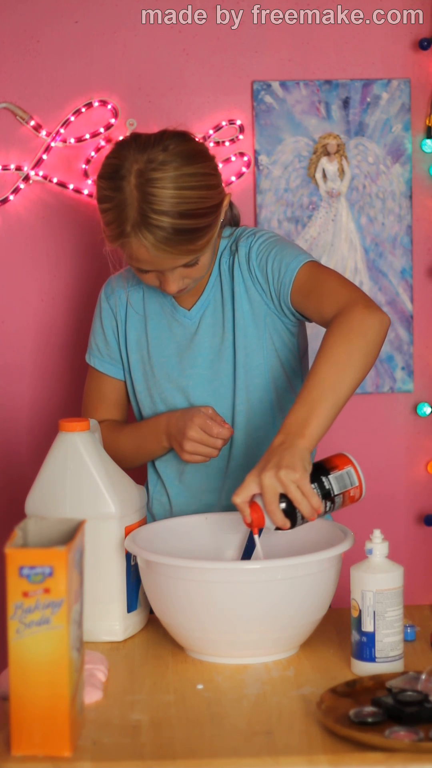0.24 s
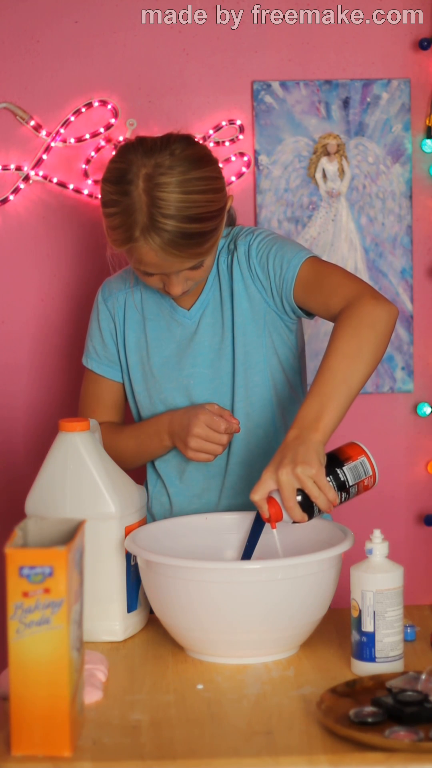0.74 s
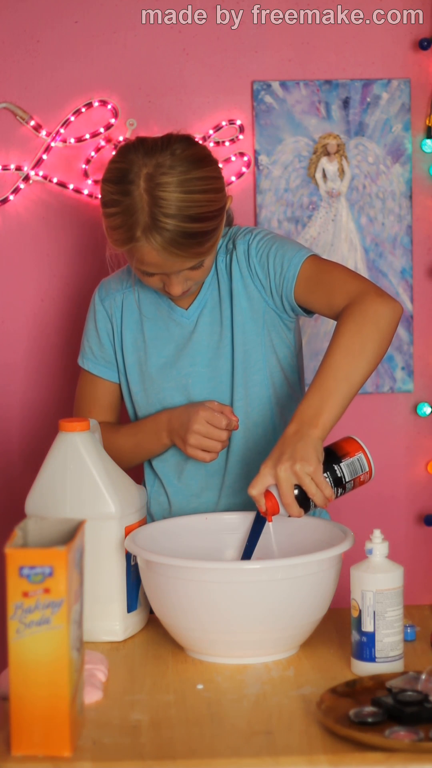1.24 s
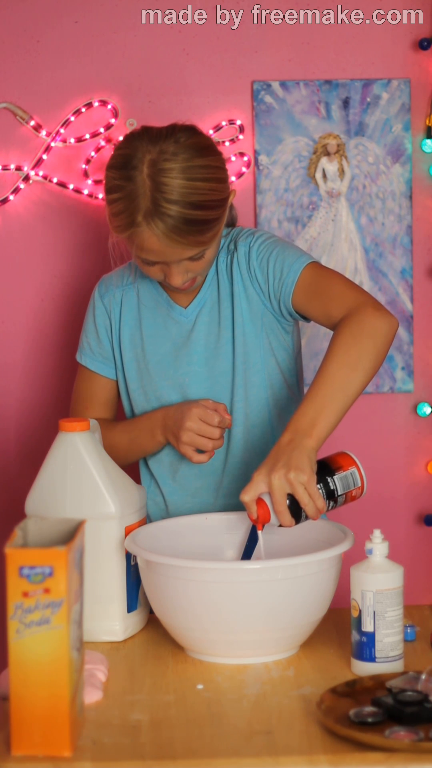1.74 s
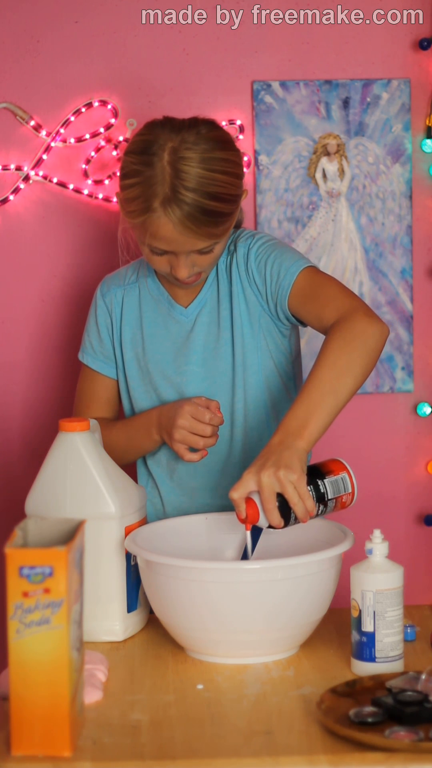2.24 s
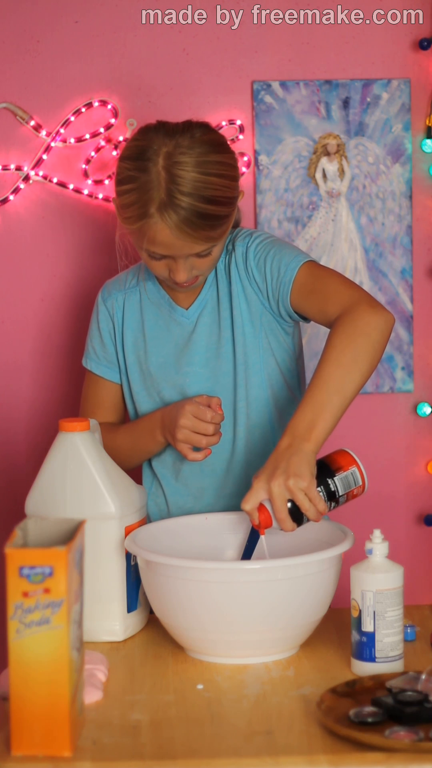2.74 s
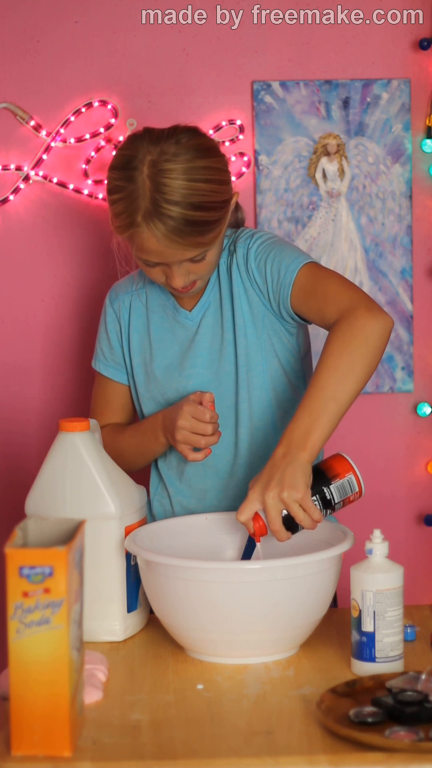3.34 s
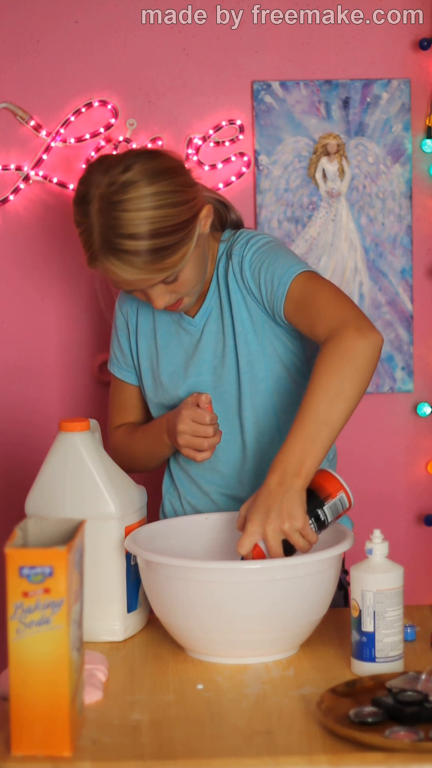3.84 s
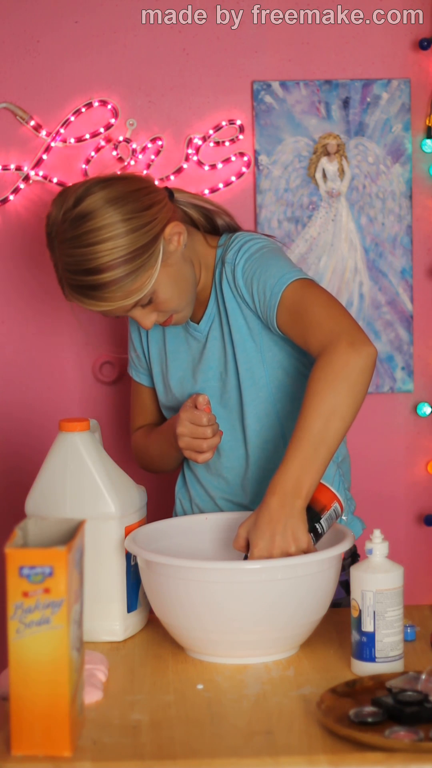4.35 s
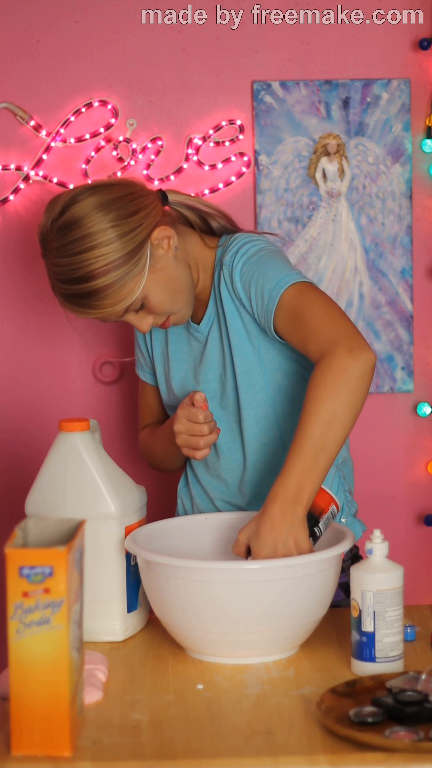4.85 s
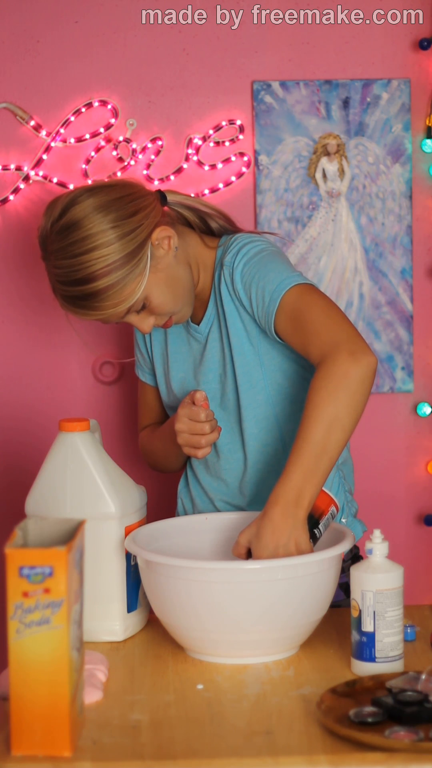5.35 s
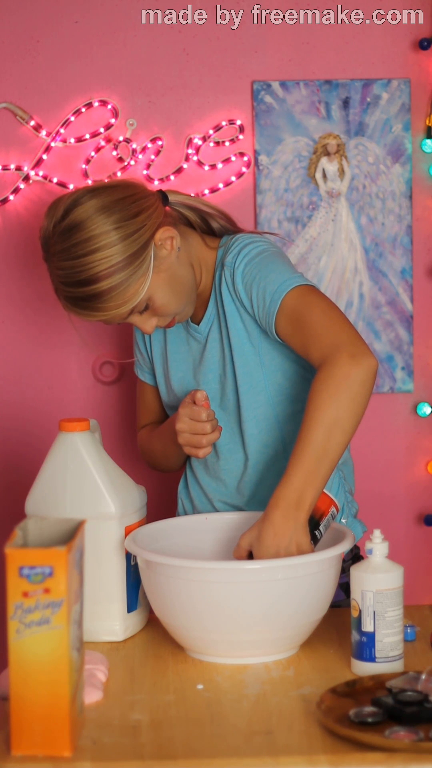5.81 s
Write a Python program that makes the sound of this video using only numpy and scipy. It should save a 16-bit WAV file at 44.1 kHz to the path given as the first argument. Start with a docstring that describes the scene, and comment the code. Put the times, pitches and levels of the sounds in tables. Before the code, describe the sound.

An aerosol can sprays foam into a plastic bowl for about six seconds, with a loud, bright hiss that is already going at the start. The jet sputters throughout: wet squelches, fine crackling bubbles and short spits of gas, with a faint wavering whistle in the noise. Its tone shifts gradually as the can moves over the bowl at about 1 second and toward the rim between 2 and 3.5 seconds, with the spits coming more often from about 2.5 seconds. Near 3.8 seconds the can is deep inside and the spray turns slightly hollower. At 4 seconds the can softly bumps the bowl's wall. From there to the end the hiss continues, dipping for instants as foam clogs the nozzle. A single microphone hears it in a small room with little echo and a very faint low rumble underneath.

```python
"""Aerosol foam sprayed into a bowl

A can sprays foam into a plastic bowl on a table in a small room, heard by one microphone.
The turbulent jet sputters: gas hisses and spits, foam gurgles, and can and bowl resonate.
The colour changes as the can is held high, over the bowl, at its rim and then deep inside,
where it bumps the wall. The house rumbles faintly underneath."""
import sys
import numpy as np
from scipy import signal
from scipy.fft import rfft, irfft
from scipy.io import wavfile
from scipy.ndimage import uniform_filter1d

SR = 44100
rng = np.random.default_rng(int(sys.argv[2]) if len(sys.argv) > 2 else 0)


def generate_wav(sig):
    """Save sig (samples, or channels by samples) to the path in sys.argv[1] as 16-bit PCM at SR."""
    pcm = np.round(np.clip(np.atleast_2d(sig).T, -1, 1) * 32767).astype(np.int16)
    wavfile.write(sys.argv[1], SR, pcm)


N = 268128
T = np.arange(N) / SR
HZ = np.maximum(np.arange(N // 2 + 1) * SR / N, 1.)

# path of the can: (time [s], place [0 high, 1 over the bowl, 2 at the rim, 3 inside])
CAN_DEPTH = [(0, 0), (.7, 0.23), (1.05, 0.76), (2.3, 1.53), (2.8, 1.22), (3.7, 2.46), (3.85, 3), (6.08, 3)]
# plugs of foam leaving the nozzle: (time [s], peak level before resonance [dB], pitch [Hz])
FOAM_PLUGS = [(.008, -24, 5530), (0.147, -15, 5400), (0.169, -12, 2770), (.35, -12.5, 5950),
              (.6, -17, 2730), (.7, -14, 5560), (0.706, -13, 2920), (.92, -15, 2850), (1.101, -11.5, 6100),
              (1.291, -13, 6050), (1.345, -11.5, 4830), (1.628, -9, 5000), (2.27, -12, 5800),
              (2.58, -9, 6160), (2.7382, -13, 4340), (2.99, -19, 4470), (3.055, -9.5, 5160),
              (3.1, -10, 5100), (3.1593, -12, 4540), (3.4028, -13, 3960), (3.479, -15, 3540),
              (3.565, -11, 4360), (3.65, -12.5, 5850), (3.6845, -12, 4060), (3.8277, -12, 3700),
              (4.135, -10.5, 4800), (4.216, -13.5, 4500), (4.7703, -14.5, 4050), (5.126, -10, 4260),
              (5.21, -13, 6230), (5.25, -10, 4670), (5.3264, -13.5, 4650), (5.446, -9.5, 4760),
              (5.565, -12, 4780), (5.5975, -9.5, 6000), (5.9946, -11, 5050), (6.064, -10, 5230)]


def undb(db):
    """Amplitude ratio of a level in decibels."""
    return 10 ** (np.asarray(db) / 20)


def curves(table):
    """Linear interpolation in time of a table's columns, one value a sample."""
    times, *columns = np.transpose(table)
    return [np.interp(T, times, column) for column in columns]


def spell(middle_s, length_s):
    """A flat-topped envelope that swells from 0 to 1 and back."""
    return np.exp(-((T - middle_s) / (length_s / 2)) ** 4)


def flicker(rate):
    """Random modulation: `rate` levels a second, smoothed and freed of slow drift; spread 1."""
    hold = max(int(SR / rate), 2)
    steps = np.repeat(rng.standard_normal(N // hold + 1), hold)
    smooth = uniform_filter1d(uniform_filter1d(steps, hold), hold)[:N]
    wander = smooth - uniform_filter1d(smooth, 8 * hold)
    return np.roll(wander, rng.integers(hold)) / wander.std()


def bubbles(rate, low_hz, high_hz, cycles, glide, scatter_db):
    """Bursting bubbles are damped oscillators, rising in pitch and decaying over about `cycles`; rms 1."""
    out = np.zeros(N + SR)
    for when, pitch, size, length in rng.random((int(rate * N / SR), 4)):
        hz = low_hz * (high_hz / low_hz) ** pitch
        turns = np.arange(int(3 * cycles * (0.67 + length) * SR / hz)) * hz / SR
        age = turns / turns[-1]
        envelope = np.exp(-4 * age) * np.minimum(turns / 2, 1)
        tone = np.sin(2 * np.pi * turns * (1 + glide * age / 2)) * envelope
        out[int(when * N):][:len(tone)] += undb(-scatter_db * np.log(0.14 + size)) * tone
    return out[:N] / out[:N].std()


def sputter(own_rate=70., shared_rate=125., froth_db=-11., crackle_db=-7, onset_hz=1500, gas_hz=7000):
    """Turbulent noise and bubbles, amplitude-modulated band by band as foam and gas take turns."""
    froth = bubbles(rate=500., low_hz=4553, high_hz=13820, cycles=20.8, glide=0.323, scatter_db=1.)
    crackle = bubbles(rate=500., low_hz=7000, high_hz=15000, cycles=4., glide=.2, scatter_db=4.)
    spectrum = rfft(rng.standard_normal(N) + undb(froth_db) * froth + undb(crackle_db) * crackle)
    centres = 1500 * 2 ** np.arange(0, 3.5, 1 / 7)  # seven bands an octave
    bands = np.array([np.exp(-.5 * (14 * np.log2(HZ / hz)) ** 2) for hz in centres])
    bands[0, HZ < centres[0]] = 1
    bands /= bands.sum(axis=0)
    gas_rush, out = flicker(shared_rate), 0
    for hz, band in zip(centres, bands):
        unrest = np.clip(np.log2(hz / onset_hz) / 3.37, 0, 1.2)  # the treble is the most restless
        follow = 1 if hz > gas_hz else -1  # a rush of gas lifts the hiss and thins the gurgle
        own_flicker = 2.5 * flicker(own_rate) + 3.3 * flicker(own_rate / 2.5)
        gain = undb(unrest * (own_flicker + 2 * follow * gas_rush))
        out = out + irfft(spectrum * band, N) * gain / np.sqrt(np.mean(gain ** 2))
    return out


def colour(place):
    """Spectral envelope of the jet: broad gain against frequency for one place of the can."""
    # one envelope for each place: (frequency [Hz], relative spectral level [dB])
    high = [(100, -72), (170, -40), (510, -30), (691, -33.5), (972, -23), (1370, -18.5), (1590, -4),
            (1890, -4), (2460, 0.5), (3950, -10.5), (6720, -1.5), (13100, -4), (15800, -16)]
    over_bowl = [(100, -65), (170, -33), (356, -28), (384, -19.5), (510, -23.5), (732, -32.5), (1590, -1.5),
                 (2000, 0), (2330, -10), (2660, -1), (4350, 6), (10000, 5), (15800, -4.5)]
    at_rim = [(100, -71), (170, -44.5), (520, -29), (583, -26.5), (1290, -8.5), (1820, -0.5), (2000, -5),
              (2330, 1.5), (2870, -4), (3880, 7), (4190, 4.5), (9460, -2), (15800, -11)]
    inside = [(100, -68), (170, -32.5), (473, -11.5), (520, -17.5), (583, -25), (885, -33.5), (1180, -21.5),
              (1890, -5.5), (3150, -3.5), (3880, -1.5), (4600, -1.5), (11700, -8.5), (15800, -19)]
    hz, db = np.transpose((high, over_bowl, at_rim, inside)[place])
    return undb(np.interp(np.log(HZ), np.log(hz), db))


def resonances(place):
    """Frequency response of can and bowl at one place: Lorentzian peaks and dips add in power."""
    # (frequency [Hz], width [Hz], gain held high [dB], over the bowl [dB], at the rim [dB], inside [dB])
    modes = [(280, 45, 9, 9, 9, 9), (365, 20, 8, 8, 9, 9), (514, 18, 13, 14, 12, 13), (645, 18, 5, 5, 5, 7),
             (893, 24, 0, 2, 5, 18), (990, 35, 9, 8, 10, 9), (1545, 80, 6, 6, 5, 3),
             (1825, 50, 3, 6, 9, 11), (1930, 60, 0, 0, 3, 9), (2325, 90, 2, 2, 5, 10),
             (2530, 40, 4, 5, 7, 0), (3010, 110, 7, 4, 0, 0), (3470, 60, 10, 4, 2, 4),
             (3600, 40, 5, 5, 0, 7), (2900, 300, 0, -2, -6, -4), (3110, 260, 0, 0, -2, -6),
             (1250, 300, 0, 0, -5, -2), (4150, 200, 0, 0, -5, 0), (4255, 30, 0, 3, 2, 8),
             (4390, 40, 0, 5, 5, 5), (4510, 40, 0, 2, 8, 0), (4700, 110, 0, 2, 0, 8),
             (5130, 90, 6, 5, 8, 7), (5460, 90, 4, 3, 2, 3), (5950, 180, 4, 4, 3, 8),
             (6420, 35, 3, 4, 3, 5), (6900, 70, 5, 3, 2, 4), (7520, 80, 2, 5, 2, 3)]
    excess_power = sum((undb(2 * db[place]) - 1) / (1 + (2 * (HZ - hz) / width_hz) ** 2)
                       for hz, width_hz, *db in modes)
    return np.sqrt(1 + excess_power)


def spray():
    """Source and filter: jet and spits excite can and bowl, whose response shifts as the can moves."""
    # slow course of the upper bands: (time [s], gurgle [dB], body [dB], gas hiss [dB])
    jet_levels = [(0, -18.5, -23.5, -25.5), (.3, -23, -24, -27.5), (.65, -21, -25, -29),
                  (1.0, -21, -27, -26.5), (1.2, -24, -26, -23), (1.6, -22.5, -28, -24.5),
                  (2.0, -20.5, -25.5, -23.5), (2.5, -21.5, -26, -24), (3.0, -22, -27, -24.5),
                  (3.35, -21, -24, -26), (3.6, -22, -24.5, -26), (4.1, -21, -25.5, -26),
                  (4.6, -19, -26.5, -27), (5.0, -21, -25, -27), (5.5, -20.5, -25.5, -27.5),
                  (5.85, -17.5, -25.5, -30.5), (6.08, -23, -26, -28)]
    # the bowl's air and wall: (level held high [dB], over the bowl [dB], at the rim [dB], inside [dB])
    hollow_by_place, boom_by_place = (-37.5, -38.5, -42, -38), (-46.5, -45.5, -45, -45)
    # crossovers between boom, hollow band, body, gurgle and gas hiss: (frequency [Hz])
    edges_hz = (600, 1400, 3300, 7000)
    # weight of a choke's loss in each of these five bands: (factor [1])
    choke_reach = (0.12, 0.09, 0.43, 1.2, 0.49)
    gurgle_db, body_db, gas_db = curves(jet_levels)
    depth, = curves(CAN_DEPTH)
    hollow_db, boom_db = (np.interp(depth, range(4), db) for db in (hollow_by_place, boom_by_place))
    band_db = np.array([boom_db, hollow_db, body_db, gurgle_db, gas_db - smother()])
    levels = undb(band_db - np.outer(choke_reach, chokes()))
    highpasses = [1 / (1 + (edge / HZ) ** 16) for edge in edges_hz]
    bands = -np.diff([np.ones_like(HZ), *highpasses, np.zeros_like(HZ)], axis=0)
    jet, bursts = rfft(sputter()), rfft(spits() + squelches())
    out = 0
    for place in range(4):
        share = np.maximum(1 - np.abs(depth - place), 0)  # crossfade between neighbouring places
        response = resonances(place)
        parts = irfft(jet * colour(place) * response * bands, N)
        flow = np.sum(levels * parts / parts.std(axis=1, keepdims=True), axis=0)
        out = out + share * (flow + irfft(bursts * response, N))
    return out


def narrow_noise(hz, width_hz, flutter_db=2.5, flutter_rate=110., steadying=.15):
    """Quadrature modulation shifts slow noise to a fluttering band whose centre may move; rms 1."""
    lowpass = 1 / (1 + (2 * HZ / width_hz) ** 2)
    in_phase, quadrature = (irfft(rfft(rng.standard_normal(N)) * lowpass, N) for _ in range(2))
    phase = 2 * np.pi * np.cumsum(np.broadcast_to(hz, N)) / SR
    tone = in_phase * np.cos(phase) + quadrature * np.sin(phase)
    tone /= np.hypot(in_phase, quadrature) ** steadying  # holds back part of the wavering
    tone *= undb(flutter_db * flicker(flutter_rate))
    return tone / tone.std()


def singing():
    """Flow-driven resonances sing as narrow bands of noise and weaken when the nozzle chokes."""
    # levels of three resonances: (time [s], first [dB], second [dB], third [dB])
    tone_levels = [(0, -46, -32, -25.5), (.72, -35, -39, -35), (.9, -36, -32, -25.5), (1.4, -34, -24, -25),
                   (1.6, -33, -42, -28), (2.3, -32, -28, -34), (2.5, -40, -25, -29), (2.65, -40, -38, -28),
                   (2.85, -23, -24.5, -25.5), (3.35, -25.5, -24, -26.5), (3.45, -19.5, -28, -34),
                   (3.85, -24.5, -36, -34), (3.95, -30, -28, -45), (4.7, -28.5, -29, -55),
                   (5.3, -28, -32, -36), (6.08, -28.5, -28, -43)]
    # drift of the second as the can moves: (time [s], frequency [Hz])
    drift = [(0, 4400), (1.5, 4390), (2.25, 4430), (2.55, 4600), (2.8, 4480), (3.6, 4500), (4.0, 4390),
             (6.08, 4400)]
    # parts of the can ringing in spells: (middle [s], length [s], level [dB], frequency [Hz])
    can_spells = [(.62, 0.21, -36, 3550), (2.12, 0.48, -31, 3550), (3.36, .3, -30, 1840),
                  (4.0, 0.23, -31, 3550), (4.2, .3, -30, 5150), (4.8, .12, -29, 1820),
                  (5.95, .28, -29, 5200)]
    inside = np.clip(curves(CAN_DEPTH)[0] - 2, 0, 1) ** 2
    centres_hz = [3925 + 60 * inside, curves(drift)[0], 2320]  # the first rises inside the bowl
    widths_hz = (125, 160, 150)
    tones = sum(undb(db) * narrow_noise(hz, width_hz)
                for hz, width_hz, db in zip(centres_hz, widths_hz, curves(tone_levels)))
    swells = np.array([undb(db) * spell(s, length) for s, length, db, _ in can_spells])
    loudest_hz = np.array(can_spells)[swells.argmax(axis=0), -1]  # only the loudest part sounds
    can_ring = swells.max(axis=0) * narrow_noise(loudest_hz, width_hz=110)
    return (tones + can_ring) * undb(-chokes())


def pops(level_db=-32):
    """Lone large bubbles burst and ring with light damping."""
    return undb(level_db) * bubbles(rate=110., low_hz=5500, high_hz=11000,
                                    cycles=60., glide=.03, scatter_db=2.)


def rumble(level_db=-66):
    """Background of the house: stationary noise with its power at low frequencies."""
    # (frequency [Hz], relative spectral level [dB])
    spectrum = [(12, -42), (20, -10), (43, -8), (70, 0.5), (139, -7.5), (167, -22), (190, 0), (250, -9),
                (420, -120)]
    hz, db = np.transpose(spectrum)
    gain = undb(np.interp(np.log(HZ), np.log(hz), db, left=-90, right=-90))
    noise = irfft(rfft(rng.standard_normal(N)) * gain, N)
    return undb(level_db) * noise / noise.std()


def room(direct, t60_s=.2, tail_db=-7, gap_s=.004):
    """Reverberation: dense reflections follow the direct sound and decay exponentially."""
    t = T[:SR // 2]
    tail = rng.standard_normal(len(t)) * 1000. ** (-t / t60_s) * (t > gap_s)
    tail *= undb(tail_db) / np.sqrt(np.sum(tail ** 2))
    return (direct + signal.fftconvolve(direct, tail)[:N]) / np.sqrt(1 + undb(2 * tail_db))


def interference(sound):
    """Destructive interference: an echo off the bowl partly cancels a band for a while."""
    # (middle [s], length [s], frequency [Hz], width [Hz], share cancelled [0-1])
    notches = [(.45, 1.0, 3860, 350, 0.4), (1.15, .7, 3300, 250, .45), (2.244, 0.87, 3190, 350, 0.43),
               (2.9, 0.67, 2860, 160, 0.7), (3.797, 0.55, 1320, 456, 0.6)]
    spectrum = rfft(sound)
    for s, length, hz, width_hz, share in notches:
        band = irfft(spectrum / (1 + (2 * (HZ - hz) / width_hz) ** 4), N)
        sound = sound - share * spell(s, length) * band
    return sound


def puffs(events, t60_s, rise_s, width_hz):
    """Transient turbulence: each event is a decaying burst of noise, band-passed around its pitch."""
    t, out = T[:SR // 10], np.zeros(N + SR)
    envelope = 1000. ** (-t / t60_s) * (1 - np.exp(-t / rise_s))
    for s, db, hz in events:
        edges = np.clip([hz - width_hz / 2, hz + width_hz / 2], 1500, 18000)
        bandpass = signal.butter(2, edges, "bandpass", fs=SR, output="sos")
        puff = signal.sosfilt(bandpass, rng.standard_normal(len(t)) * envelope)
        out[int(s * SR):][:len(t)] += undb(db) * puff / np.abs(puff).max()
    return out[:N]


def squelches():
    """Each plug of foam leaves the nozzle with a wet, narrow-band burst of noise."""
    return puffs(FOAM_PLUGS, t60_s=0.08, rise_s=.01, width_hz=1120)


def smother(full_loss_db=6, full_plug_db=-4, length_s=0.037):
    """Attenuation of the gas hiss in dB as a plug passes, in proportion to its squelch's amplitude."""
    half_s = length_s / 2
    return sum(full_loss_db * undb(db - full_plug_db) * np.exp(-((T - s - half_s) / half_s) ** 2)
               for s, db, _ in FOAM_PLUGS)


def chokes(clear_share=0.64):
    """Throttling loss in dB: foam chokes the nozzle, which clears in a share of the time that took."""
    # (time of the deepest point [s], loss [dB], nominal length [s])
    blockages = [(0.054, 8, 0.018), (1.952, 5, 0.026), (2.043, 5, 0.058), (2.495, 3.5, 0.039),
                 (2.945, 5, 0.042), (3.236, 3, 0.12), (3.549, 5, 0.048), (3.815, 2.5, 0.036),
                 (3.872, 2, .03), (4.206, 4, 0.06), (4.496, 5, 0.067), (4.672, 3, 0.041),
                 (4.917, 7.5, 0.082), (5.116, 7.5, 0.07), (5.36, 3.5, 0.03), (5.53, 2, 0.043),
                 (5.653, 7, .04), (5.782, 3, 0.12)]
    loss_db = np.zeros(N)
    for s, db, length in blockages:
        slope_s = length / 2 * np.where(T < s, 1, clear_share)
        loss_db += db * np.exp(-((T - s) / slope_s) ** 2)
    return loss_db


def spits():
    """Gas spits from the nozzle in short, bright bursts of broadband turbulence."""
    # (time [s], peak level before resonance [dB], pitch [Hz])
    gas_bursts = [(0.7272, -11.5, 12100), (1.5514, -13, 8250), (2.5167, -6.5, 8050), (2.8265, -9.5, 7140),
                  (2.8744, -14, 7100), (3.0335, -12, 10900), (3.2939, -10.5, 8200), (3.3727, -12, 8660),
                  (3.5808, -18, 7740), (3.923, -12, 7000), (4.4558, -10.5, 11700), (4.6643, -11.5, 9400),
                  (4.9482, -16, 10400), (5.2769, -9.5, 6800), (5.3393, -10.5, 9150), (5.5099, -16, 10900),
                  (5.8272, -13, 8560), (5.8581, -10, 7110), (5.9673, -12, 11300)]
    return puffs(gas_bursts, t60_s=0.05, rise_s=.012, width_hz=3500)


def bumps(rise_s=0.0041):
    """Impact excitation: soft blows of the can set the damped modes of the bowl's wall ringing."""
    # (time [s], peak level [dB])
    blows = [(4.009, -21.5), (4.047, -30)]
    # (frequency [Hz], relative level [dB], time to decay by 60 dB [s])
    wall_modes = [(296, -6, 0.16), (420, 0, .05), (525, 0, 0.2), (650, -6, 0.2), (980, -6, 0.095)]
    t, out = T[:SR // 2], np.zeros(N + SR)
    ring = sum(undb(db) * 1000. ** (-t / t60) * np.sin(2 * np.pi * hz * t) for hz, db, t60 in wall_modes)
    ring *= 1 - np.exp(-t / rise_s)
    for s, db in blows:
        out[int(s * SR):][:len(t)] += undb(db) * ring / np.abs(ring).max()
    return out[:N]


def scene():
    """Superposition of all sources at one microphone, the same on both channels."""
    popping = pops()
    direct = interference(spray() + singing()) + popping + bumps()
    return np.tile(room(direct) + rumble(), (2, 1))


def record(dry, drive=.7, top_hz=15800):
    """Soft saturation rounds the loudest peaks, and a steep low-pass cuts the top."""
    lowpass = signal.ellip(12, .2, 90, top_hz, fs=SR, output="sos")
    return signal.sosfilt(lowpass, np.tanh(drive * dry) / drive)


dry = scene()
out = record(dry)
generate_wav(out)
```